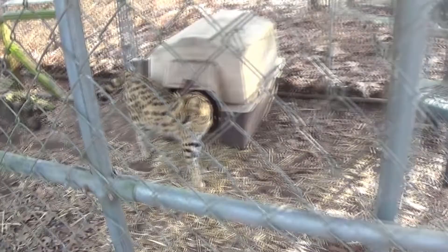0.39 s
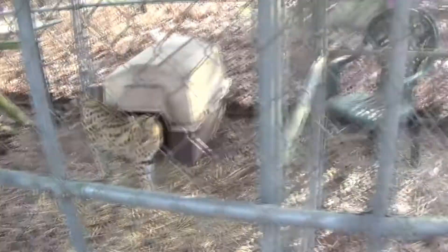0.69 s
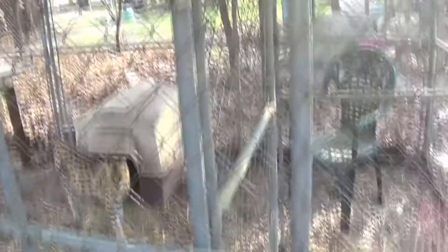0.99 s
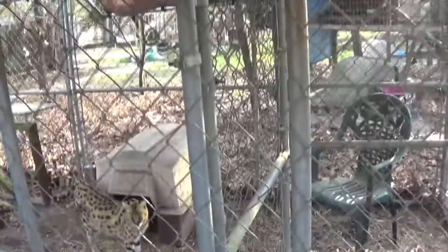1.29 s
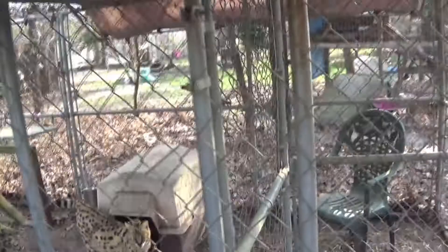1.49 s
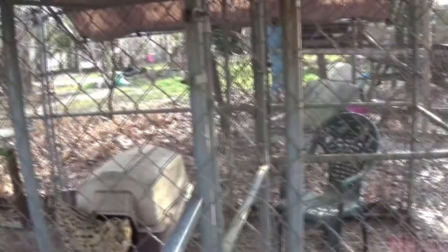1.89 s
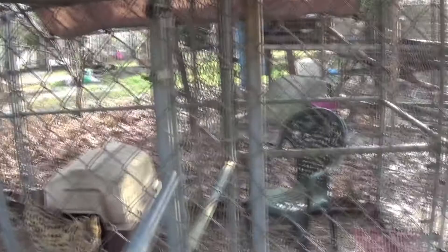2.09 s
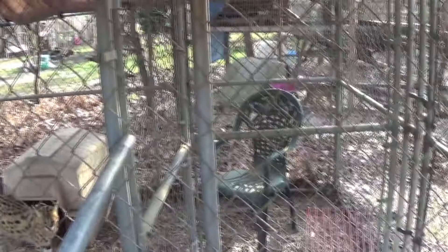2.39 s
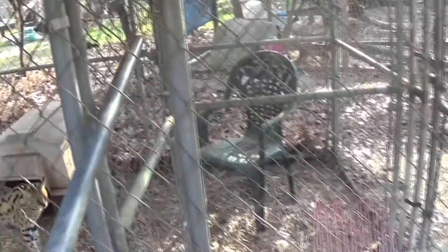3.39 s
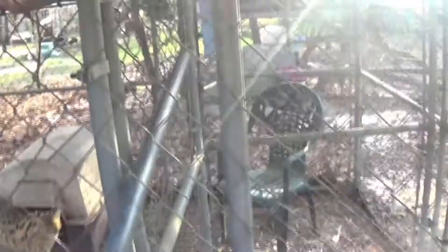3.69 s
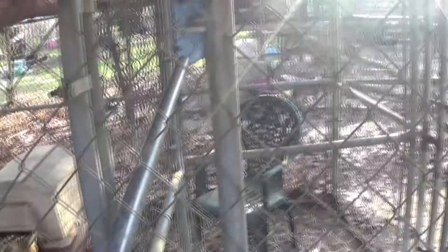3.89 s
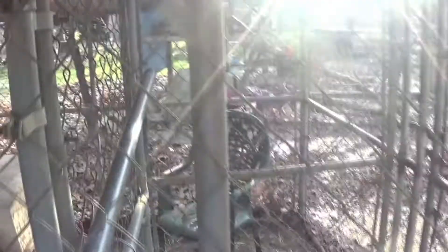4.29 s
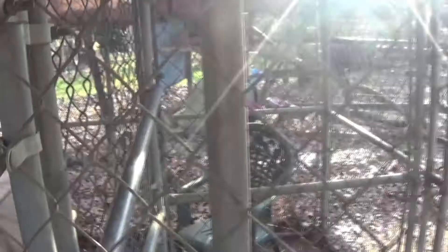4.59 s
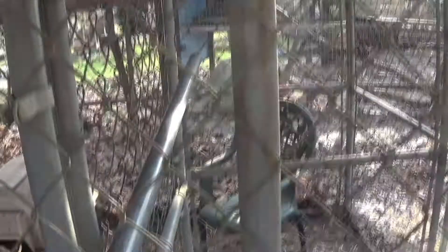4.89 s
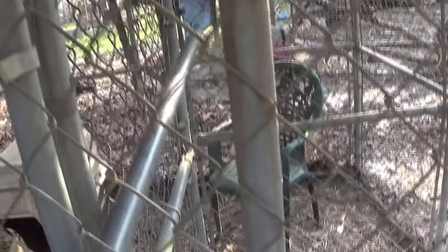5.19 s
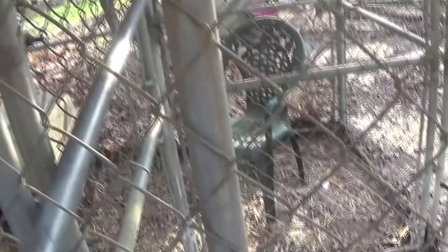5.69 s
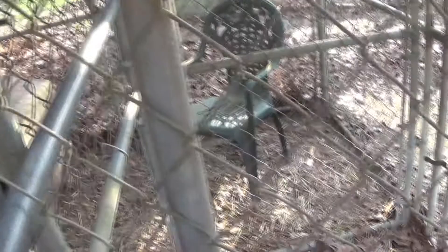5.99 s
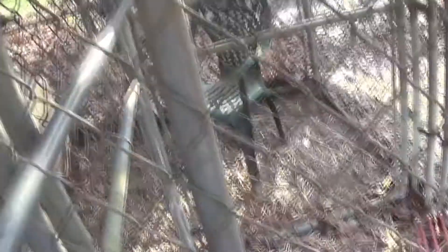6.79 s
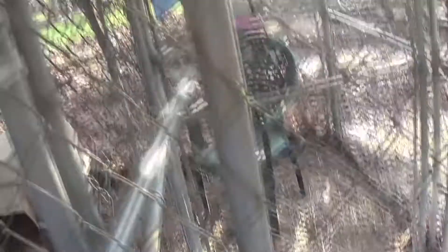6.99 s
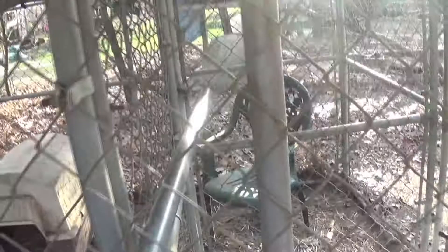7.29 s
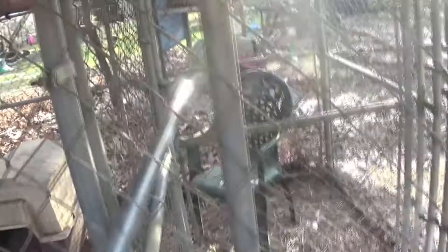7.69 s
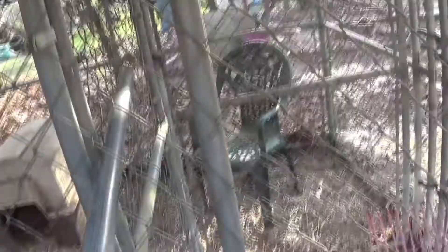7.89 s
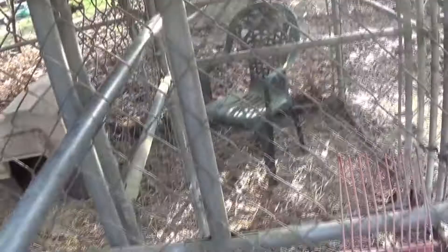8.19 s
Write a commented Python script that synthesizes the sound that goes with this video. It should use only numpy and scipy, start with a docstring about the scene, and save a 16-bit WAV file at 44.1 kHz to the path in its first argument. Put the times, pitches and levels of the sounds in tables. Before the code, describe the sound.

Leaves crackle underfoot, then a metal pole and steel bowl clank, scrape and crash against a chain-link fence over a faint animal growl.

```python
"""An outdoor animal pen, the microphone close to its chain-link fence. Dry leaves crackle under a few
steps; a long metal pole clanks on the mesh and drags a steel bowl along it, a little to the left.
Straight ahead a caged animal growls, low and faint. Then the bowl crashes and chatters against the
fence, squeals on its rim and scrapes over wires that snap free. The force of each blow sets how
strongly bowl, links, wires and panel answer; the drag sets the scraping."""
import sys
import numpy as np
from scipy import signal
from scipy.fft import rfft, irfft, next_fast_len
from scipy.io import wavfile
from scipy.ndimage import uniform_filter1d

SR = 44100
rng = np.random.default_rng(int(sys.argv[2]) if len(sys.argv) > 2 else 0)


def file_out(sig):
    """Save sig as 16-bit WAV at sys.argv[1]."""
    # one column per channel
    cols = np.atleast_2d(sig).T
    # limit, then scale
    lim = np.clip(cols, -1, 1)
    pcm = np.round(lim * 32767).astype(np.int16)
    wavfile.write(sys.argv[1], SR, pcm)


N = 363825


def amp(db):
    """Decibels to gain."""
    return 10 ** (np.asarray(db) / 20)


def unit(x):
    """Scale to rms 1."""
    return x / np.sqrt(np.mean(x ** 2) + 1e-20)


def normed(x):
    """Scale to energy 1."""
    return x / (np.linalg.norm(x) + 1e-20)


def along(points, hz):
    """Read (frequency, value) points on a log axis."""
    freqs, values = np.transpose(points)
    return np.interp(np.log(hz + 1), np.log(freqs + 1), values)


def curves(rows):
    """One value per sample for each column after the time."""
    times, *columns = np.transpose(rows)
    return np.array([np.interp(np.arange(N) / SR, times, column) for column in columns])


def during(rows):
    """1 while a curve lasts, with 20 ms edges."""
    t = np.arange(N) / SR
    return np.clip(np.minimum(t - rows[0][0], rows[-1][0] - t) / .02 + 1, 0, 1)


def level(rows):
    """The gain of a (time, level) curve, silent outside it."""
    return amp(curves(rows)[0]) * during(rows)


def wobble(rate):
    """A smooth random curve, rate knots a second."""
    knots = rng.standard_normal(SR // 2)
    return signal.resample(knots[:int(rate * N / SR) + 2], N)


def grainy(rate, depth_db):
    """A gain of mean power 1 that comes in tiny bursts, like many small contacts."""
    return unit(amp(depth_db * np.tanh(wobble(rate) / 2) * 2.5))


def fading(t60, hold=0):
    """One second of envelope: level for hold seconds, then dying away."""
    return amp(-60 * np.maximum(np.arange(SR) / SR - hold, 0) / t60)


def tone(hz):
    """One second of a sine at a chance phase."""
    return np.sin(2 * np.pi * (hz * np.arange(SR) / SR + rng.random()))


def add(track, s, sound):
    """Mix a sound into a track at s seconds."""
    room = track[..., round(s * SR):][..., :sound.shape[-1]]
    room += sound[..., :room.shape[-1]]


def filtered(x, response):
    """x through a complex response of frequency."""
    size = next_fast_len(N + SR // 2)
    return irfft(rfft(x, size) * response(np.fft.rfftfreq(size, 1 / SR)), size)[..., :N]


def noise(spectrum):
    """Coloured noise of rms 1."""
    return unit(filtered(rng.standard_normal(N), lambda hz: amp(along(spectrum, hz))))


def causal(spectrum, size=2048):
    """The shortest causal pulse with a given spectrum."""
    cepstrum = irfft(np.log(amp(along(spectrum, np.fft.rfftfreq(size, 1 / SR)))))
    cepstrum[1:size // 2] *= 2
    cepstrum[size // 2 + 1:] = 0
    return irfft(np.exp(rfft(cepstrum)))


# Open air at the pen: (frequency [Hz], density [dB])
AIR_SPECTRUM = [(12, -36), (20, -8), (101, 2), (255, 0.5), (558, -3.5), (1440, -17), (2750, -14.5),
                (3160, -17), (6910, -18), (7730, -14), (9400, -19), (14300, -35), (16000, -30)]

def air(level_db=-58.5):
    """Quiet outdoor air, a steady bed of noise."""
    return amp(level_db) * noise(AIR_SPECTRUM)


# Leaves stirring near the microphone: (time [s], relative level [dB])
RUSTLE = [(0.0, -53.5), (0.9, -48.5), (1.15, -42.5), (1.39, -49), (1.95, -51.5), (2.1, -67)]
# Their colour: (frequency [Hz], density [dB])
LEAF_SPECTRUM = [(590, 0), (1000, 10), (1570, 7), (3230, 0.5), (3670, 3.5), (4520, -2.5), (8360, 8.5),
                 (16000, -9)]

def rustle():
    """Dry leaves rustle faintly in many tiny contacts."""
    return amp(-10) * level(RUSTLE) * noise(LEAF_SPECTRUM) * grainy(rate=1200, depth_db=4)


# Steps and soft knocks in the litter: (time [s], relative thud [dB], relative crunch [dB])
STEPS = [(0.091, -47, -44.5), (0.428, -65, -53), (0.838, -55, -38.5), (1.267, -52.5, -35.5),
         (1.684, -55.5, -45.5), (2.85, -51, -51), (3.556, -45.5, -30.5)]
# The ground underfoot: (frequency [Hz], density [dB])
THUD_SPECTRUM = [(60, -38), (200, -25), (400, -4.5), (650, -11.5), (1100, -14.5), (2500, -39)]
# Crushed leaves: (frequency [Hz], density [dB])
CRUNCH_SPECTRUM = [(350, -28), (600, 5), (1450, 3), (2150, 4), (2910, 0.5), (3160, 2.5), (8050, 1),
                   (16000, -23)]

def steps(press_s=0.027):
    """Each foot presses briefly, thudding on the ground and crunching the leaves."""
    thud, crunch = np.zeros((2, N))
    press = (1 - fading(0.0074)) * fading(0.15, press_s)
    for s, thud_db, crunch_db in STEPS:
        add(thud, s, amp(thud_db) * press)
        add(crunch, s, amp(crunch_db - 3.5) * press)
    return thud * noise(THUD_SPECTRUM) + crunch * noise(CRUNCH_SPECTRUM) * grainy(rate=840, depth_db=2)


# Single cracks in the litter, close by: (time [s], relative level [dB])
TWIGS = [(0.333, -29.5), (0.5363, -31), (0.628, -27.5), (0.841, -19.5), (0.933, -29.5), (1.002, -31),
         (1.094, -29), (1.119, -27), (1.1814, -20), (1.1874, -35), (1.2078, -20), (1.214, -20),
         (1.357, -30.5)]

def twigs(band_hz=(6847.5, 9322.5), t60=0.086):
    """Dry leaves and twigs crack in short, high bursts."""
    out = np.zeros(N)
    band = signal.butter(1, band_hz, "band", fs=SR)
    for s, db in TWIGS:
        crack = signal.lfilter(*band, rng.standard_normal(SR) * fading(t60))
        add(out, s, amp(db + 8) * normed(crack))
    return out


# The pole strikes the mesh, close to the microphone:
# (time [s], force [dB], brightness over force [dB], song of the pole [dB], t60 [s])
CLANKS = [(2.125, -25.5, 7, -31, 0.12), (2.249, -28.5, 7.5, -34.5, 0.16), (2.369, -35.5, -1, -42.5, 0.4),
          (2.504, -26.5, -0.5, -31.5, 0.14), (2.613, -39.5, 1, -59, 0.11), (2.687, -35.5, 9.5, -38, 0.25),
          (3.339, -35.5, 8.5, -44, 0.23), (3.771, -37.5, -3, -67, 0.23), (3.874, -40.5, -0.5, -42.5, 0.42),
          (3.982, -36.5, 2.5, -50, 0.39), (4.063, -35.5, 2.5, -44, 0.54), (4.787, -43.5, 0.5, -65, 0.26),
          (5.36, -34.5, 7, -58, 0.46), (5.618, -18.5, -3, -47, 0.31), (5.684, -20, -10.5, -56, 0.17),
          (6.028, -26.5, 5, -40, 0.24), (6.253, -27, 5.5, -38, 0.27), (6.369, -28.5, -3, -42, 0.12),
          (7.387, -56, 16.5, -58, 0.11), (7.815, -40, 13, -52, 0.37), (8.217, -28.5, 8, -42, 0.17)]

def clank_power(weight_db=-7):
    """Contact power in the bowl, mesh and wire bands: a clank rattles out, weakly in the bowl."""
    power = np.zeros((3, N))
    for s, db, bright_db, _, t60 in CLANKS:
        bands = amp([db + weight_db, db, db + bright_db])
        add(power, s, np.outer(bands, amp(-4) * fading(t60)) ** 2)
    return power


def links(force, ring_db=-11, t60=0.096, count=90, size=4096):
    """The contact moves on: about every tenth of a second new links jangle at their own pitches."""
    out = force.copy()
    decay = fading(t60)[:2 * size]
    for start in range(0, N, size):
        notes = np.zeros(size + 1, complex)
        phases = np.exp(2j * np.pi * rng.random(count))
        notes[rng.integers(size // 20, size // 2, count)] = phases  # 1.1 to 11 kHz
        jangle = amp(ring_db) * normed(irfft(notes) * decay)
        add(out, start / SR, signal.fftconvolve(force[:, start:start + size], jangle[None], axes=1))
    return out / np.sqrt(1 + amp(ring_db) ** 2)


# The fence's own modes: (frequency [Hz], energy over the bare contact [dB], t60 [s])
FENCE_MODES = [(293, -25, 0.04), (667.6, -20, 0.089), (755, -25, 0.092), (1092, -21, 0.04),
               (3157, -28.5, 0.58), (3370, -21, 0.095), (6930, -31, 0.053), (8000, -29, 0.067),
               (8880, -20, 0.07), (9430, -23.5, 0.1)]
# Metal touching metal, at close range: (frequency [Hz], density [dB])
CONTACT_SPECTRUM = [(100, -31), (250, -8), (450, -6.5), (700, -3.5), (1100, -2), (2000, 2), (3500, 0.5),
                    (5000, -0.5), (7000, 0), (9300, 0.5), (11000, -8), (13500, -18), (16000, -32)]

def fence_response(jangle_db=-7.5, jangle_t60=0.031, shimmer_db=-8, shimmer_t60=0.39):
    """One contact: a click, the main modes, the jangle of nearby links, the shimmer of the panel."""
    t = np.arange(SR) / SR
    ring = sum(amp(db) * normed(np.cos(2 * np.pi * hz * t) * fading(t60)) for hz, db, t60 in FENCE_MODES)
    ring += amp(jangle_db) * normed(rng.standard_normal(SR) * fading(jangle_t60))
    ring += amp(shimmer_db) * normed(rng.standard_normal(SR) * fading(shimmer_t60))
    ring[0] += 1  # the click
    return signal.fftconvolve(ring, causal(CONTACT_SPECTRUM))


# The bands of bowl, mesh and wires: (low edge [Hz], high edge [Hz])
BAND_EDGES = [(60, 1400), (1400, 5500), (5500, 17000)]

def fence(size=36000):
    """Blows and scraping are showers of tiny contacts; each stretch of mesh rings anew."""
    blows = clank_power() + tap_power() + crash_power() + wire_power(SNAPS)
    power = blows * grainy(rate=700, depth_db=1.5) ** 2 + scrape_power()
    force = links(np.sqrt(power) * rng.standard_normal((3, N)))
    filters = [signal.butter(3, edges, "band", fs=SR, output="sos") for edges in BAND_EDGES]
    out = np.zeros(N)
    for start in range(0, N, size):
        response = fence_response()[:size]
        bands = np.array([normed(signal.sosfilt(sos, response)) for sos in filters])
        add(out, start / SR, signal.fftconvolve(force[:, start:start + size], bands, axes=1).sum(0))
    return out


# The long tube's modes, the lowest two beating: (frequency [Hz], relative level [dB])
POLE_MODES = [(3367, 2.5), (3376, 1), (3779, -10), (6115, -15), (8856, -65)]

def pole(free_t60=1.02, pressed_t60=0.45, tap_db=-11):
    """Blows feed the tube's song; it rings long only when it rebounds freely from a clean clank."""
    power, t = np.zeros(N), np.arange(N) / SR
    release = np.minimum(1, 8 - 8 * np.arange(SR) / SR)
    for s, _, _, song_db, _ in CLANKS:
        t60 = np.interp(song_db, [-48, -36], [pressed_t60, free_t60])
        add(power, s, (amp(song_db) * fading(t60) * release) ** 2)
    pressed = [(s, song_db) for s, *_, song_db, _, _ in CRASHES] + [(s, db + tap_db) for s, db in TAPS]
    for s, song_db in pressed:
        add(power, s, (amp(song_db) * fading(pressed_t60)) ** 2)
    song = sum(amp(db) * np.sin(2 * np.pi * hz * t + .25 * wobble(8)) for hz, db in POLE_MODES)
    return amp(-7) * np.sqrt(power) * song


def clinks(low_hz=3660, high_hz=9600, bright_share=0.79, crash_db=-7):
    """A loose link hits the pole and rings briefly on two bending modes, each split by its kink."""
    out = np.zeros(N)
    throws = [(s, db + bright_share * bright_db) for s, db, bright_db, *_ in CLANKS]
    throws += [(s, db + bright_share * bright_db + crash_db) for s, db, bright_db, *_ in CRASHES]
    for s, db in throws + list(TAPS):
        hz = low_hz * (1 + .0202 * rng.standard_normal())  # no two links are alike
        low = tone(hz) + tone(hz * .965) / 2
        high = sum(tone(high_hz * (1 + .035 * rng.standard_normal())) for _ in range(4)) / 2
        add(out, s, amp(db) * (low * fading(0.06) + amp(-5) * high * fading(0.083)))
    return out


# The steel bowl's modes: (frequency [Hz], relative level [dB], t60 [s])
BOWL_MODES = [(337.3, -14.5, 0.7), (669.6, 2.5, 0.31), (1089, -1, 0.2), (1470, -45, 0.09),
              (1573, -16, 0.57), (2430, -18, 0.45)]

def bowl(choke=0.56, loose_db=-36, clank_db=-19.5):
    """The bowl clangs anew with every blow; a hard one pins the rim and chokes the lowest mode."""
    out = np.zeros(N)
    blows = [(s, db + clank_db) for s, db, *_ in CLANKS]
    blows += [(s, clang_db) for s, _, _, _, clang_db, *_ in CRASHES]
    attack = 1 - fading(.015)
    for s, clang_db in blows:
        modes = [amp(db + rng.normal(0, 2)) * tone(hz) * fading(t60) for hz, db, t60 in BOWL_MODES]
        modes[0] *= amp(-choke * (clang_db - loose_db))
        add(out, s, amp(clang_db + 1.5) * attack * sum(modes))
    return out


def cluster(events, low_hz, high_hz, t60, gain_db, count):
    """Each event sets a fresh handful of crowded modes ringing; some die sooner than others."""
    out, t = np.zeros(N), np.arange(SR // 5) / SR
    for s, db in events:
        place, phase, life = rng.random((3, count, 1))
        hz = low_hz * (high_hz / low_hz) ** place
        modes = np.sin(2 * np.pi * (hz * t + phase)) * amp(-60 * t / (t60 * (.5 + life)))
        add(out, s, amp(db + gain_db) * modes.sum(0) / np.sqrt(count / 2))
    return out


def knocks():
    """A clank pings the pole's end; a crash knocks the bowl's wall and twangs the wires."""
    clangs = [(s, clang_db) for s, _, _, _, clang_db, *_ in CRASHES]
    forces = [(s, db) for s, db, *_ in CRASHES]
    songs = [(s, song_db) for s, _, _, song_db, _ in CLANKS]
    wall = cluster(clangs, low_hz=827, high_hz=3240, t60=0.07, gain_db=2, count=20)
    wires = cluster(forces, low_hz=6340, high_hz=7650, t60=0.1, gain_db=-8, count=14)
    pole_end = cluster(songs, low_hz=3126, high_hz=3510, t60=0.28, gain_db=-1, count=6)
    return wall + wires + pole_end


def ticks(snap_db=-5, snap_t60=0.027, blow_db=-9, blow_t60=0.11, bright_share=1.7):
    """A glancing blow opens with a bright tick; a wire leaving the rim gives a shorter one."""
    envelope = np.zeros(N)
    for s, db, bright_db, *_ in list(CLANKS) + list(CRASHES):
        add(envelope, s, amp(db + bright_share * bright_db + blow_db) * fading(blow_t60))
    for s, db in SNAPS:
        add(envelope, s, amp(db + snap_db) * fading(snap_t60))
    return envelope * noise([(3000, -20), (7000, 2), (10500, 4), (13000, -5.5), (16000, -21)])


# How hard the metal drags over the mesh: (time [s], force [dB])
DRAG = [(2.15, -37), (2.2, -45), (2.45, -50.5), (2.95, -48), (3.3, -57.5), (3.87, -52.5), (4.0, -44.5),
        (4.19, -42), (4.29, -35), (4.42, -43), (4.6, -42.5), (4.88, -55.5), (5.08, -47), (5.16, -40.5),
        (5.34, -49), (5.55, -36), (5.7, -45), (5.84, -29.5), (6.2, -42), (6.46, -33), (6.75, -39),
        (6.9, -29.5), (6.98, -25.5), (7.3, -38.5), (7.65, -37), (7.8, -39.5), (8.25, -33)]

def scrape_power(catches_per_s=16, catch_db=-1, catch_t60=0.044, reference_db=-40):
    """Contact power of sliding metal: a harder drag is louder and brighter; it catches at random."""
    drag_db = curves(DRAG)[0] - reference_db
    bands = amp([-49 + 0.67 * drag_db, -43 + 0.9 * drag_db, -43 + 1.13 * drag_db])  # bowl, mesh, wires
    sliding = during(DRAG) * grainy(rate=410, depth_db=2)
    catches = (rng.random(N) < catches_per_s / SR) * amp(catch_db + 2.9 * rng.standard_normal(N)) ** 2
    jolts = np.abs(signal.fftconvolve(catches, fading(catch_t60) ** 2)[:N])
    return (bands * sliding) ** 2 * (1 + jolts)


# Thin wires under a hard pull: (frequency [Hz], density [dB])
SIZZLE_SPECTRUM = [(6000, -19), (9500, -16), (11500, 3), (13500, -7), (16000, -13)]

def sizzle(drag_db=-19, screech_db=-8):
    """The finest wires sizzle while the metal slides, most during the screeching pulls."""
    pull = amp(drag_db) * level(DRAG) + amp(screech_db) * level(SCREECH)
    return pull * noise(SIZZLE_SPECTRUM) * grainy(rate=820, depth_db=10)


# The caged animal, faint and straight ahead: (time [s], pitch [Hz], relative level [dB])
GROWL = [(2.25, 88.6, -51.5), (2.42, 97.1, -60), (2.52, 132.8, -58), (2.8, 131, -58), (3.0, 87.4, -57),
         (3.55, 77.23, -58.5), (4.2, 79, -57), (4.38, 88.15, -60), (4.47, 88.43, -45), (4.72, 95, -52),
         (5.08, 89.2, -55), (5.15, 88, -54)]
# The resonances of its throat: (frequency [Hz], gain [dB])
THROAT_RESPONSE = [(40, -32.5), (90, -1.5), (170, -0.5), (270, -15), (450, -17.5), (720, -11.5),
                   (1000, -25.5), (2500, -50)]

def growl(jitter=0.0098, rasp_db=1, throat_db=3):
    """Slow, uneven pulses of the throat over a deep chest tone; a rasp rides on each pulse."""
    pitch_hz, db = curves(GROWL)
    cycles = np.cumsum(pitch_hz * (1 + jitter * wobble(30))) / SR
    pulses = np.diff(np.floor(cycles), prepend=0) * amp(2.5 * wobble(60))
    rasp = noise([(100, -25), (300, 0), (3000, 0), (6000, -20)]) * np.exp(-3 * (cycles % 1))
    voice = unit(pulses - pulses.mean()) + amp(rasp_db) * unit(rasp)
    throat = signal.fftconvolve(voice, causal(THROAT_RESPONSE))[:N]
    chest = np.cos(2 * np.pi * cycles) * amp(1.5 * wobble(10))
    fade = uniform_filter1d(during(GROWL), SR // 8)
    return fade * amp(db) * (amp(throat_db) * unit(throat) + chest)


# A loose link swings on and taps the pole: (time [s], force [dB])
TAPS = [(2.794, -38), (2.858, -38), (2.912, -40.5), (2.961, -34), (3.016, -38.5)]

def tap_power(scuff_db=0.5):
    """Contact power of the tapping link as it scuffs the wires."""
    return wire_power([(s, db + scuff_db) for s, db in TAPS])


# The bowl hits the fence, close to the microphone: (time [s], force [dB], brightness over force [dB],
# weight over force [dB], clang of the bowl [dB], song of the pole [dB], chatter [s], t60 [s])
CRASHES = [(3.492, -22.5, 1, -19, -43, -25.5, 0.041, 0.08), (4.444, -20, -0.5, -5, -61, -51, 0.015, 0.31),
           (5.383, -16, -4, -9.5, -24, -41, 0.02, 0.24), (5.43, -19.5, -22, -7, -32.5, -30, 0.005, 0.77),
           (5.735, -19, -0.5, -8.5, -24.5, -38, 0.0087, 0.35),
           (5.768, -17, -5.5, -1, -25.5, -35, 0.023, 0.17), (5.859, -16, -13, -7.5, -35, -46, 0.004, .035),
           (6.435, -20, 3.5, -9.5, -32.5, -44, 0.038, 0.32),
           (6.482, -18.5, -13, -9, -38.5, -22.5, 0.04, 0.35),
           (6.771, -19.5, -15, -10, -30.5, -28, 0.0051, 0.4), (6.802, -32, 13.5, -16, -37, -26, .018, 0.16),
           (6.924, -31, 12, -20, -51, -28, 0.007, 0.21), (7.839, -21.5, 3.5, -9, -31, -26, 0.048, 0.21),
           (7.913, -22, 5.5, -10, -35, -32, 0.037, .19), (7.965, -23, 1.5, -7, -43.5, -37, 0.032, 0.32),
           (8.093, -21.5, 3, -14, -64, -45, 0.022, .11), (8.115, -24, 4, -5.5, -57, -54, 0.023, 0.2)]

def crash_power():
    """Contact power of the crashing bowl: it opens with a spike, chatters and dies away."""
    power = np.zeros((3, N))
    for s, db, bright_db, weight_db, _, _, chatter_s, t60 in CRASHES:
        bands = amp([db + weight_db, db, db + bright_db])
        envelope = amp(-5) * fading(t60, chatter_s) + amp(-15.5) * fading(0.057)
        add(power, s, np.outer(bands, envelope) ** 2)
    return power


def thumps(gain_db=-13, t60=0.15):
    """The weight behind a crash thumps the post."""
    envelope = np.zeros(N)
    for s, db, _, weight_db, *_ in CRASHES:
        add(envelope, s, amp(db + weight_db + gain_db) * fading(t60))
    return envelope * noise([(70, -25), (140, -3), (260, 0.5), (480, -0.5), (700, 1), (1500, -45)])


# The fence panel swaying, a low rumble: (frequency [Hz], density [dB])
RUMBLE_SPECTRUM = [(15, -17), (45, -0.5), (90, -2.5), (150, -1), (300, -11), (1000, -70)]

def panel_sway(gain_db=-35, t60=7.0, rise_s=0.16):
    """The fence panel sways after each crash: a low rumble swells just after it and slowly fades."""
    power, t = np.zeros(N), np.arange(N) / SR
    swell = (1 - np.exp(-t / rise_s)) * amp(-60 * t / t60)
    for s, db, *_ in CRASHES:
        add(power, s, (amp(db + gain_db) * swell) ** 2)
    return np.sqrt(power) * noise(RUMBLE_SPECTRUM)


def judder(modes, depth_db):
    """Metal sticks and slips on metal and drives a few resonances; rms 1."""
    def body(hz):
        return sum((-1) ** k * amp(db) * 1j * hz * width / (centre ** 2 - hz ** 2 + 1j * hz * width)
                   for k, (centre, width, db) in enumerate(modes))
    slips = rng.standard_normal(N) * grainy(rate=420, depth_db=depth_db)
    return unit(filtered(slips, body))


# Resonances of the slack mesh: (frequency [Hz], width [Hz], relative level [dB])
BUZZ_MODES = [(1714, 340, -2.5), (2030, 90, 3.5), (2560, 210, -1), (5914, 410, -6)]

def buzz(gain_db=-32, t60=1):
    """The slack mesh buzzes on after the first crash."""
    envelope = np.zeros(N)
    add(envelope, CRASHES[0][0], amp(gain_db) * fading(t60) * (1 - fading(0.06)))
    return envelope * judder(BUZZ_MODES, depth_db=0)


# Wires snap off the bowl's rim: (time [s], force [dB])
SNAPS = [(5.93, -33), (5.963, -26.5), (6.86, -18.5), (6.949, -13), (7.011, -15), (7.06, -15), (7.099, -26),
         (7.116, -16.5), (7.144, -20), (7.186, -25), (7.24, -23.5), (7.632, -27), (7.659, -29),
         (7.687, -26)]

def wire_power(events, bowl_db=-15, mesh_db=-13.5):
    """Contact power of snapped or scuffed wires: a hard spike and a tail, mostly in the wire band."""
    power = np.zeros((3, N))
    envelope = amp(-7) * fading(0.015) + amp(-8) * fading(0.16)
    for s, db in events:
        add(power, s, np.outer(amp([db + bowl_db, db + mesh_db, db]), envelope) ** 2)
    return power


# One short squeal of the rim: (time [s], relative level [dB])
SQUEAL = [(6.58, -42.5), (6.676, -28), (6.732, -39), (6.75, -66)]
# The rim's resonances: (frequency [Hz], width [Hz], relative level [dB])
RIM_MODES = [(622, 15, -2), (1120, 260, -4), (1633, 23, 9), (2100, 270, -6), (3600, 530, -4),
             (4650, 1500, -8.5)]

def squeal(gain_db=7):
    """The bowl's rim sticks and slips on the fence."""
    return amp(gain_db) * level(SQUEAL) * judder(RIM_MODES, depth_db=0.5)


# Two hard pulls across the wires: (time [s], relative level [dB])
SCREECH = [(6.79, -30), (6.87, -26), (6.92, -57), (6.97, -26), (7.14, -29.5), (7.25, -40)]
# The wires' resonances: (frequency [Hz], width [Hz], relative level [dB])
SCREECH_MODES = [(2170, 81, -3), (3230, 240, 2.5), (9050, 700, 3), (10340, 600, -3)]

def screech(gain_db=2.5):
    """The wires screech as the bowl judders roughly across them."""
    return amp(gain_db) * level(SCREECH) * judder(SCREECH_MODES, depth_db=4)


# Scatter from posts and pen walls: (frequency [Hz], level over the direct sound [dB])
SCATTER = [(60, -30), (250, -20), (1000, -14.5), (4000, -14.5), (8000, -17), (12000, -23)]

def yard(direct, t60=0.014):
    """Posts and walls scatter a short answer between left and right; it shifts at random."""
    echoes = [normed(rng.standard_normal(SR) * fading(t60)) for _ in range(2)]
    first, second = [signal.fftconvolve(direct, echo)[:N] for echo in echoes]
    turn = np.pi * wobble(9)
    side = filtered(np.cos(turn) * first + np.sin(turn) * second, lambda hz: amp(along(SCATTER, hz)))
    return np.array([direct + side, direct - side])


# Where the close sounds sit at the microphone: (frequency [Hz], left minus right [dB])
LEFT_BIAS = [(250, 0), (550, 2.2), (1000, 2.9), (2500, 2.8), (4500, 2.1), (8000, 1.1), (12000, 0)]

def scene():
    """Fence and leaves are close, a little to the left; growl, rumble and air sit in the centre."""
    blows = fence() + thumps() + sizzle() + knocks() + ticks() + bowl() + pole() + clinks()
    friction = squeal() + buzz() + screech()
    litter = twigs() + rustle() + steps()
    near = yard(blows + friction + litter)
    near = filtered(near, lambda hz: amp(np.outer([.5, -.5], along(LEFT_BIAS, hz))))
    return near + yard(growl() + panel_sway() + air())


def record(dry, top_hz=15900):
    """The microphone passes nothing above its band limit."""
    return filtered(dry, lambda hz: hz < top_hz)


dry = scene()
out = record(dry)
file_out(out)
```